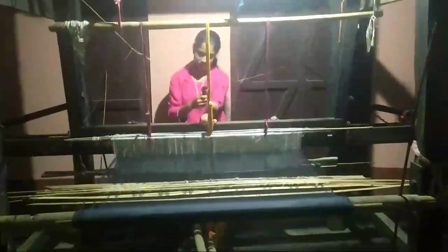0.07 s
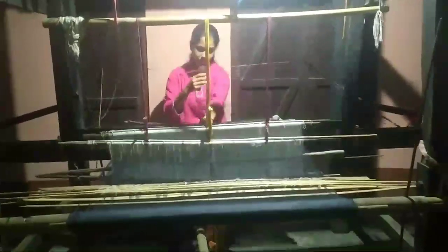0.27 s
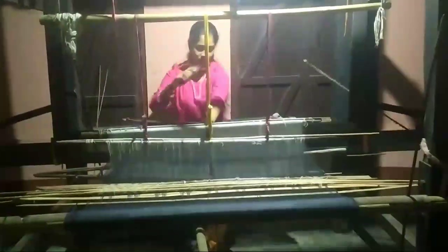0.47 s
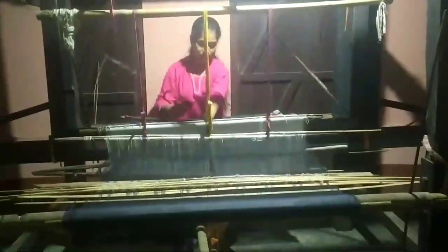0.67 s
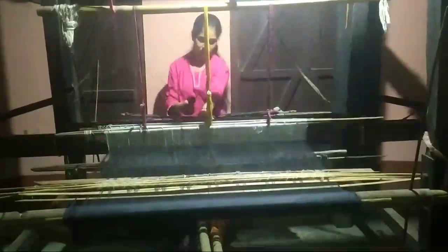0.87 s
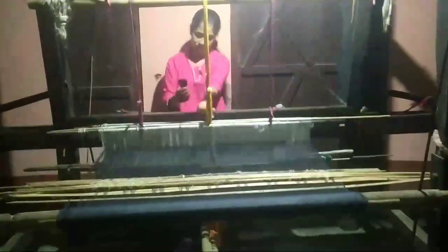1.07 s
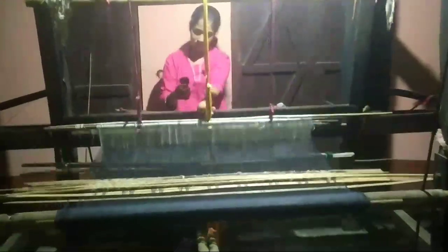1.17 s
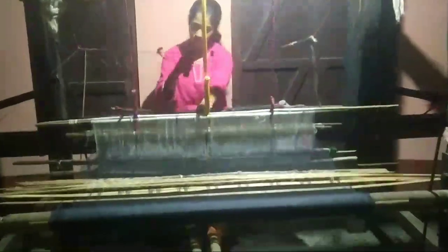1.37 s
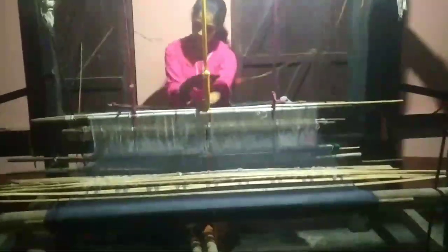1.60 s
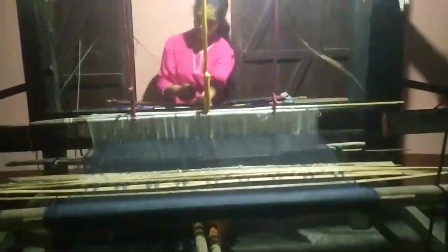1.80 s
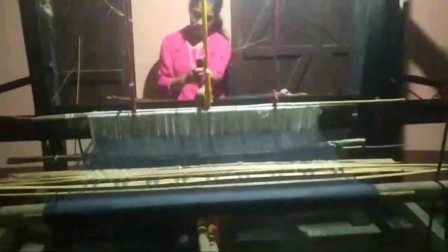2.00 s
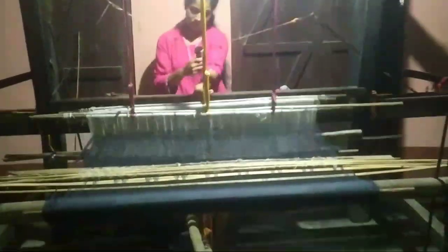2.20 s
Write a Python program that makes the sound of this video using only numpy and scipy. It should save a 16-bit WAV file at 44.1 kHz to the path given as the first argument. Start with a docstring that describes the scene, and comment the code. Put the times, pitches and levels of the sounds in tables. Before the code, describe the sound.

Wood knocks and rattles on wood as a loom is worked by hand in an echoing room. The clacks come in quick clusters, ease off briefly, then pick up again, with soft low thuds and faint hiss beneath.

```python
"""Wood clacks on wood in uneven bursts: a handloom worked by hand in a bare, echoing room.
Each knock is a quick clatter of tiny taps that rings a slat and the frame, and the room smears it
into a long tail. Four soft, low thuds of the frame and floor sound among the knocks.
Faint hiss and low rumble lie underneath, all heard through a small two-port microphone."""
import sys
import numpy as np
from scipy import signal
from scipy.fft import rfft, irfft, next_fast_len
from scipy.io import wavfile
from scipy.ndimage import uniform_filter1d

SR = 44100
rng = np.random.default_rng(int(sys.argv[2]) if len(sys.argv) > 2 else 0)


def store_wav(level_fs):
    """Save 16-bit WAV to argv[1]."""
    pcm = np.round(np.clip(np.atleast_2d(level_fs), -1, 1) * 32767)
    wavfile.write(sys.argv[1], SR, pcm.T.astype(np.int16))


N = 99225


def loom():
    """The loom at work: each knock arrives directly and through one of six room tails."""
    # The blows of wood on wood. Each row: start in seconds, slat pitch in Hz, six relative band levels
    # in dB from low to high, clatter decay in seconds, left-minus-right pan in dB, swell in seconds.
    knocks = [ (-.04,4460,-39,-30,-31,-26,-30.5,-38,0.015,0.5,0.0081),
              (.17,4220,-55,-51,-56,-46,-47,-54,0.017,-1.5,0.025),
              (.211,2816,-48,-24,-16.5,-26.5,-24.5,-43.5,.004,-1.5,0.0014),
              (.233,4220,-29.5,-19.5,-19.5,-13,-13.5,-25.5,0.0092,2.5,0.009),
              (.257,3880,-35,-24.5,-35,-14.5,-32,-51,0.0023,-1.5,0.0058),
              (.295,3970,-33.5,-24,-26.5,-20,-33,-54,0.0062,-1.5,0.014),
              (.471,3500,-38.5,-37.5,-34,-45,-54,-55,0.012,1,0.012),
              (.49,3300,-38,-36,-33.5,-33,-36.5,-50,0.022,1,0.0061),
              (.56,4750,-30,-23,-28.5,-28.5,-32,-46,0.012,-2,0.0022),
              (.587,4980,-38.5,-26.5,-29.5,-26.5,-33,-52,0.007,1,0.0027),
              (.596,3670,-45,-32,-33.5,-25.5,-37.5,-47,0.0033,-4,0.0033),
              (.62,3500,-34,-51,-37,-46,-34,-45,0.0057,-1,0.0059),
              (.655,3750,-53,-64,-51,-56,-51,-58,.014,11,0.01),
              (.725,3440,-45.5,-56,-68,-45,-48,-53,0.0047,0,0.0078),
              (.828,4630,-53,-65,-51,-54,-47,-59,0.012,1,.012),
              (.858,4400,-51,-48,-52,-45.5,-45.5,-52.5,0.011,0,0.032),
              (.995,4360,-57,-66,-50.5,-51,-50,-65,0.047,-1,0.018),
              (1.042,3470,-52.5,-44,-47,-41,-41.5,-50,0.014,-1,0.021),
              (1.154,4240,-71,-51,-58,-75,-86,-80,0.011,-1,0.0094),
              (1.202,4530,-50,-35.5,-37,-43,-50,-62,0.013,-1,0.0012),
              (1.23,4440,-71,-38.5,-59,-40.5,-47,-53.5,0.0063,-0.5,0.0086),
              (1.272,4270,-46.5,-39,-36,-46,-45,-54,0.012,-0.5,0.015),
              (1.296,4290,-45,-23.5,-25.5,-20,-24,-36.5,0.0057,0,0.0031),
              (1.317,4320,-42,-38,-33,-19.5,-37.5,-61,0.0047,-1,0.022),
              (1.456,4660,-51.5,-47.5,-63,-35,-40,-37,0.016,0.5,0.011),
              (1.546,4200,-46,-33,-34,-41,-44,-56,.016,0,.004),
              (1.58,4400,-38,-32.5,-21.5,-35.5,-29.5,-52,0.0059,-1.5,0.0082),
              (1.593,1102,-31,-20,-23.5,-16.5,-18.5,-31,0.006,3,0.016),
              (1.62,3600,-37,-24,-31,-28,-40,-55,0.012,0,0.0045),
              (1.651,4220,-55,-29.5,-34,-45,-52,-60,0.0094,-5,0.0021),
              (1.676,4200,-39.5,-38,-35,-27.5,-36.5,-48,0.0089,2.5,0.0067),
              (1.718,4270,-52,-27.5,-36,-32.5,-35,-42,0.007,0,0.012),
              (1.811,3440,-31,-37,-31.5,-35.5,-40,-50,0.039,-0.5,0.03),
              (1.826,3720,-37.5,-42,-34,-34,-34,-55.5,0.0078,3,0.0072),
              (1.848,3670,-36.5,-26.5,-32,-25.5,-35,-51,0.016,-0.5,0.0017),
              (1.886,3810,-39,-28.5,-30,-22.5,-31,-46.5,0.025,-1,0.00096),
              (1.935,3680,-44,-33,-34,-31,-34,-41.5,0.028,1.5,0.0049),
              (2.02,863,-35,-37,-47,-39.5,-54,-58,0.0048,-0.5,0.0031),
              (2.038,854,-37.5,-32.5,-61,-39,-42,-50,0.0062,1.5,0.0023),
              (2.095,4010,-40,-51,-45.5,-42.5,-42,-47,0.038,0.5,0.0033)]
    room_db, pan_offset_db = 1, 1.5
    slat_ring_db, slat_ring_width_hz = 5, 110
    left_lag = round(0.00026 * SR)  # the direct sound reaches the left port later
    lead = SR // 10  # space for a knock already sounding at the start
    tails = [room_tail() for _ in range(6)]
    out = np.zeros((2, N + 2 * SR))
    for k, (start_s, slat_hz, *band_db, decay_s, pan_db, swell_s) in enumerate(knocks):
        clack = knock(slat_hz, band_db, decay_s, swell_s)
        sound = amp(room_db) * signal.fftconvolve(clack[None], tails[k % len(tails)], axes=1)
        # Only the direct sound gets this extra short, pitched ring of the slat.
        slat_ring = signal.lfilter(*signal.iirpeak(slat_hz, slat_hz / slat_ring_width_hz, SR), clack)
        direct = clack + amp(slat_ring_db) * slat_ring
        sound[0, left_lag:left_lag + len(direct)] += direct
        sound[1, :len(direct)] += direct
        at = lead + round(start_s * SR)
        out[:, at:at + sound.shape[1]] += sound * pan_gains(pan_db + pan_offset_db)
    return out[:, lead:lead + N]


def knock(slat_hz, band_db, decay_s, swell_s):
    """One clack: a quick run of tiny taps swells, dies away and sets the wood ringing."""
    size, taps_per_s, spread_db = 4096, 6000, 1.5
    t, hz = np.arange(size) / SR, np.abs(np.fft.fftfreq(size, 1 / SR))
    lands = rng.random(size) < taps_per_s / SR
    strength = amp(spread_db * np.minimum(rng.exponential(1, size), 3))
    taps = lands * strength * rng.choice([-1., 1.], size)
    taps *= np.minimum(t / swell_s + .1, 1) * np.exp(-t / decay_s)
    taps /= np.linalg.norm(taps)
    # Even out the taps' spectrum so that the clatter adds no pitch of its own.
    tap_power = uniform_filter1d(abs(np.fft.fft(taps)) ** 2, size=19, mode="wrap")
    colour_db = wood_colour(hz, slat_hz, band_db) - 10 * np.log10(tap_power + .1)
    log_gain = np.log(amp(colour_db))
    ring = np.fft.ifft(np.exp(np.conj(signal.hilbert(log_gain)))).real  # minimum phase: a sharp attack
    return signal.fftconvolve(taps, ring[:2048])


def wood_colour(hz, slat_hz, band_db):
    """One blow's tone in dB: a broad curve, the frame's modes a little retuned, and the slat's peak."""
    # The six bands of a knock's tone. Each entry: frequency in Hz.
    band_hz = [420, 930, 2050, 4000, 6000, 9800]
    # The modes of the wooden frame. Each row: frequency in Hz, width in Hz, boost or cut in dB.
    frame_modes = [(171.6, 120, 11), (419, 120, 4), (901, 265, 4.5), (1160, 105, 0.5), (1465, 720, 5),
                   (2630, 890, 4.5), (6430, 3600, 0), (7820, 1050, -4.5), (9700, 2630, 6)]
    gain_db, detune = 36, .02
    db = gain_db + read(list(zip(band_hz, band_db)), hz)
    octaves_below = np.maximum(np.log2(band_hz[0] / (hz + 5)), 0)
    octaves_above = np.maximum(np.log2((hz + 5) / band_hz[-1]), 0)
    db -= 9.5 * octaves_below + 39.5 * octaves_above
    for mode_hz, width_hz, height_db in frame_modes:
        db += resonance(hz, mode_hz * (1 + detune * rng.uniform(-1, 1)), width_hz, height_db)
    return db + resonance(hz, slat_hz, width_hz=280, height_db=1)


def thuds():
    """Four soft, low thuds of the frame and floor, each a quickly dying sine at a set time."""
    # The low thuds. Each row: start in seconds, level in dB before the soft attack rounds it off.
    cues = [(0.233, -44), (0.562, -32), (.66, -38), (1.9, -37)]
    base_hz, rise_s, t60_s = 75, 0.0058, 0.096
    t, out = np.arange(SR // 4) / SR, np.zeros(N + SR)
    for start_s, level_db in cues:
        hz = base_hz * rng.uniform(1.0, 1.14)
        envelope = (1 - np.exp(-t / rise_s)) * amp(level_db - 60 * t / t60_s)
        out[round(start_s * SR):][:len(t)] += envelope * np.sin(2 * np.pi * hz * t)
    return out[:N]


def room_tail():
    """The bare room's dense echoes, each band dying at its own speed."""
    # The room's reverb time. Each row: frequency in Hz, seconds to fall by 60 dB.
    decay_times = [(150, 0.36), (250, 0.7), (400, 0.49), (1000, 0.47), (2700, 0.38), (5000, 0.4),
                   (10000, 0.3), (14000, 0.3)]
    predelay_s, rise_s = 0.0019, 0.0037
    t = np.arange(SR // 2 + 8192) / SR
    echoes = rng.standard_normal((2, len(t))) ** 3  # cubing makes single echoes stand out
    tail = diffuse(echoes, lambda hz, s: amp(-60 * s / read(decay_times, hz)[:, None]))
    tail *= np.clip((t - predelay_s) / rise_s, 0, 1)
    return tail / np.linalg.norm(tail, axis=1, keepdims=True)


def room_noise():
    """A steady bed of faint hiss and low rumble."""
    # The colour of the room tone. Each row: frequency in Hz, relative level in dB.
    spectrum = [(20, -38), (40, -17), (64, -5), (100, -10.5), (150, -17), (400, -29), (1000, -45),
                (2500, -23.5), (5000, -22.5), (10000, -28.5), (15500, -51)]
    rms_db = -54
    noise = diffuse(rng.standard_normal((2, N)), lambda hz, s: 1)
    noise = irfft(rfft(noise) * amp(read(spectrum, np.fft.rfftfreq(N, 1 / SR))), N)
    return amp(rms_db) * noise / np.sqrt(np.mean(noise ** 2))


def diffuse(noises, shape):
    """Two noises made as alike as the ports hear them, with a gain of shape(Hz, seconds)."""
    # How alike diffuse sound is at the two ports. Each row: frequency in Hz, likeness from 0 to 1.
    port_likeness = [(60, 0.79), (290, 1), (640, 0.8), (1400, 0.067), (15000, 0.021)]
    hz, t, (left, other) = signal.stft(noises, SR, nperseg=512)
    likeness = read(port_likeness, hz)[:, None]
    right = likeness * left + np.sqrt(1 - likeness ** 2) * other
    shaped = np.array([left, right]) * shape(hz, t)
    return signal.istft(shaped, SR, nperseg=512)[1][:, :noises.shape[1]]


def resonance(hz, centre_hz, width_hz, height_db):
    """A bell-shaped boost or cut in dB."""
    return height_db / (1 + (2 * (hz - centre_hz) / width_hz) ** 2)


def pan_gains(left_minus_right_db):
    """Left and right gains that share a level gap equally."""
    return amp(left_minus_right_db * np.array([[.5], [-.5]]))


def amp(db):
    """Decibels to gain."""
    return 10 ** (np.asarray(db) / 20)


def read(points, hz):
    """A curve through (Hz, value) points on a log-frequency axis."""
    point_hz, value = np.transpose(points)
    return np.interp(np.log(hz + 1), np.log(point_hz + 1), value)


def scene():
    """The loom and its thuds over the room noise."""
    return loom() + thuds() + room_noise()


def record(dry):
    """The microphone: a quieter, duller left port, softly rounded peaks and a cut of the top treble."""
    # The balance of the two ports. Each row: frequency in Hz, left-minus-right level in dB.
    port_balance = [(60, -3), (200, -7.5), (500, -4.5), (1300, -7.5), (4400, -10), (9000, -12),
                    (12000, -20), (15000, -29)]
    ceiling, cutoff_hz = .87, 15500
    size = next_fast_len(N + 2048)
    port_gains = pan_gains(read(port_balance, np.fft.rfftfreq(size, 1 / SR)))
    heard = irfft(rfft(dry, size) * port_gains, size)[:, :N]
    rounded = ceiling * np.tanh(heard / ceiling)
    lowpass = signal.firwin(1023, cutoff_hz, window=("kaiser", 9), fs=SR)
    return signal.oaconvolve(rounded, lowpass[None], "same")


dry = scene()
out = record(dry)
store_wav(out)
```